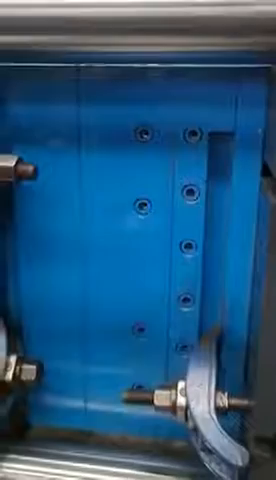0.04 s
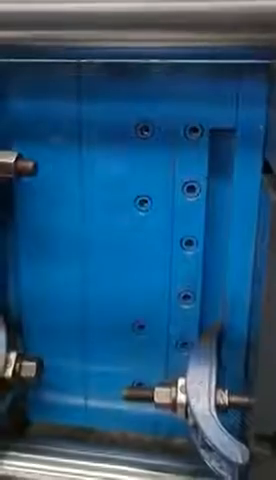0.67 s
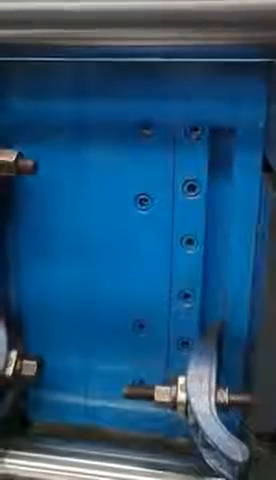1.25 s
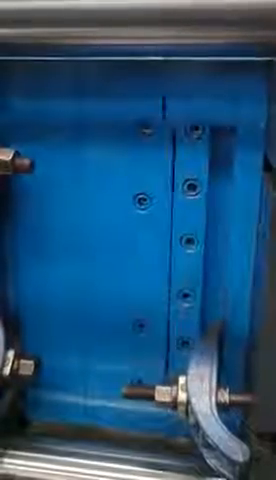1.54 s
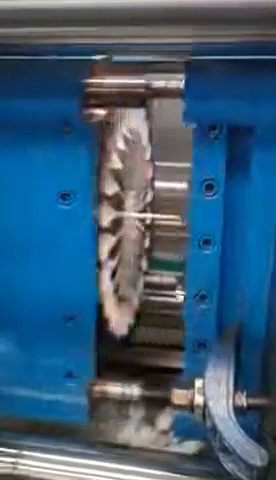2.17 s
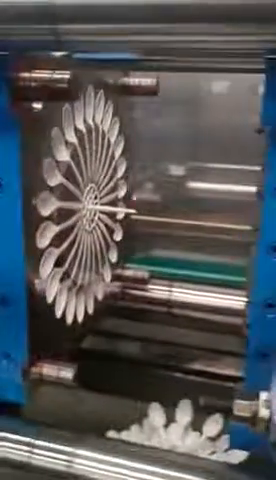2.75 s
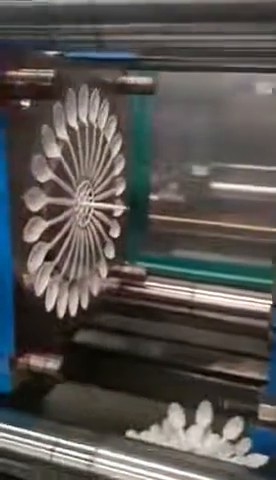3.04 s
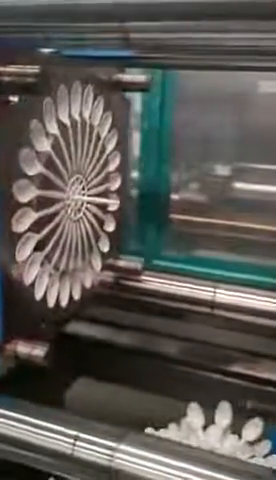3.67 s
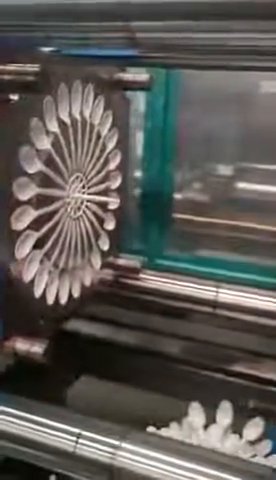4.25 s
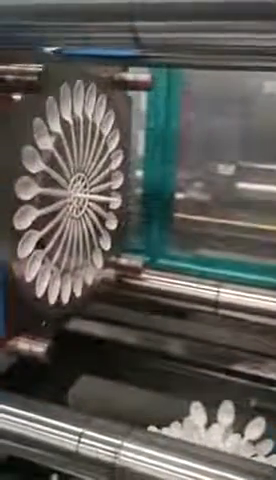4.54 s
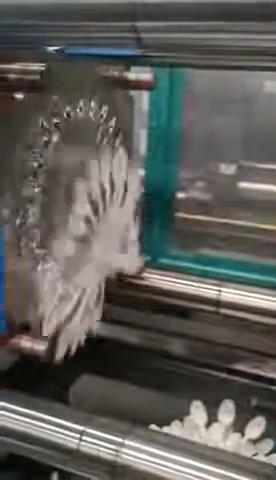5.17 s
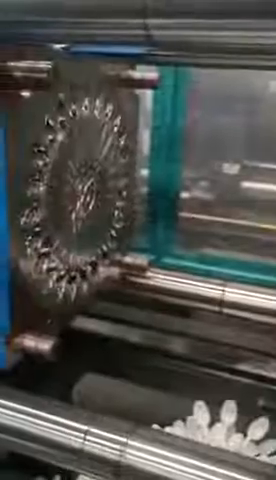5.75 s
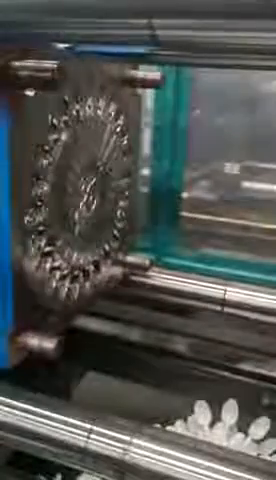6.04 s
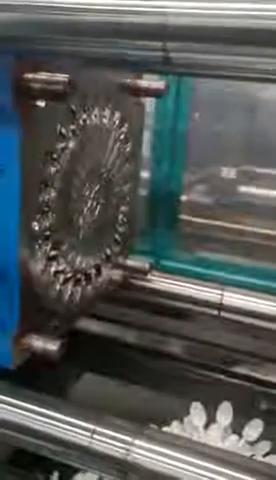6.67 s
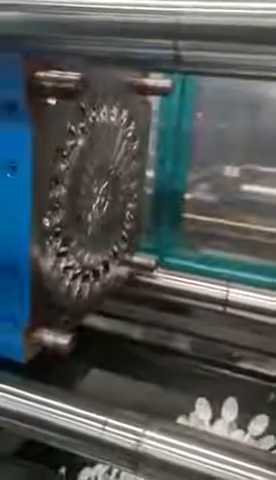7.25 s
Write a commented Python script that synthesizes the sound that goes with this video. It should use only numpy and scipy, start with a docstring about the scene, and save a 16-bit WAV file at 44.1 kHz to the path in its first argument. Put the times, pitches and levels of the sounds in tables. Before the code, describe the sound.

Over a hydraulic hum, a steel mould thumps open and squeaks, and two chattering ejector strokes follow, the first dropping plastic spoons.

```python
"""An injection moulding machine, close by in a factory hall, opens its mould and ejects plastic spoons.
Its ejector runs twice (out, bounce, back, chatter), leaving the steel ringing; on the first stroke the
spoons tear loose and rattle down. Before that the clamp lets go with thumps and a crunch, and the platen
slides off, groaning and squeaking. Underneath, the hydraulic pump hums and sags in pitch under load,
over the rumble and rush of oil."""
import sys
import numpy as np
from scipy import signal
from scipy.fft import rfft, irfft, next_fast_len
from scipy.io import wavfile
from scipy.ndimage import uniform_filter1d

SR = 44100
rng = np.random.default_rng(int(sys.argv[2]) if len(sys.argv) > 2 else 0)


def master(y):
    """Save y as 16-bit WAV."""
    cut = np.clip(np.atleast_2d(y).T, -1, 1)
    pcm = np.round(cut * 32767)  # scale
    wavfile.write(sys.argv[1], SR, pcm.astype(np.int16))


N = 322371
T = np.arange(N) / SR
FREQS = np.fft.rfftfreq(N, 1 / SR)
SIDES = np.array([[1], [-1]])  # left, right


def undb(db):
    """Decibels to gain."""
    return 10 ** (np.asarray(db) / 20)

def unit(x):
    """Scale to rms 1."""
    return x / np.sqrt(np.mean(x ** 2))

def over_time(points):
    """Automation curve through (t/s, value) points."""
    return np.interp(T, *np.transpose(points))

def over_hz(points):
    """Curve through (f/Hz, value) points on a log-frequency axis."""
    hz, value = np.transpose(points)
    return np.interp(np.log(FREQS + 1), np.log(hz), value)

def walk(rate):
    """Smooth random modulator of rms 1 that moves at up to about rate Hz."""
    steps = signal.resample_poly(rng.standard_normal(int(2 * rate * N / SR) + 2), 8, 1)
    return unit(np.interp(T, np.linspace(0, T[-1], len(steps)), steps))

def fade(t, t60):
    """Exponential decay, 60 dB down after t60."""
    return np.exp(-np.log(1000) * t / t60)

def add(out, s, x):
    """Mix x into out from time s."""
    start = int(s * SR)
    part = x[..., :N - start]
    out[..., start:start + part.shape[-1]] += part

def swells(table, steep=2.95):
    """Envelope of rounded bursts, each with its own rise and fall."""
    power = 0
    for s, db, rise, fall in table:
        from_peak = np.abs(T - s) / np.where(T < s, rise, fall)
        power += (undb(db) / (1 + from_peak ** steep)) ** 2
    return np.sqrt(power)

def ring(modes, t, push_s, detune, spot_db=0):
    """Modes rung by a push that builds over push_s, each as strongly as the struck spot allows."""
    out = 0
    for (hz, db, t60, lag), (off, spot) in zip(modes, rng.standard_normal((len(modes), 2))):
        phase = 2 * np.pi * hz * (1 + detune * off) * t + lag * SIDES
        out += undb(db + spot_db * spot) * fade(t, t60) * np.sin(phase)
    return out * (1 - np.exp(-(t / push_s) ** 2))

def stick_slip(table, rate, chatter_db, octave_db):
    """Bursts of rubbing: a tone and its octave stumble in pitch and strength."""
    drift = np.cumsum(walk(rate)) / SR
    grip = unit(undb(chatter_db * walk(rate / 2)))
    out = 0
    for *burst, hz, jitter in table:
        phase = 2 * np.pi * hz * (T + jitter * drift)
        out += swells([burst]) * (np.sin(phase) + undb(octave_db) * np.sin(2 * phase))
    return np.sqrt(2) * grip * out

# Stereo image of the noise: f/Hz, left-right correlation (clipped to +-0.99 in use)
LIKENESS = [(80, 5.5), (200, 1.05), (500, 0.62), (900, 0.13), (1500, -0.33), (2600, 0), (7000, 0)]
def colour(spectrum, x=None, hollow_db=3.5, hollow_width_hz=45):
    """Stereo noise (or x) shaped to a spectrum, at rms 1; long waves reach both sides alike."""
    mid, side = rfft(rng.standard_normal((2, N)) if x is None else x)
    alike = np.clip(over_hz(LIKENESS), -.99, .99)
    mid, side = mid * np.sqrt(1 + alike), side * np.sqrt(1 - alike)
    # reflections inside the guards raise narrow peaks among the short waves
    comb = uniform_filter1d(rng.standard_normal((2, len(FREQS))), int(hollow_width_hz * N / SR) + 1)
    db = over_hz(spectrum) + hollow_db * unit(comb) * np.minimum(FREQS / 1000, 1)
    return unit(irfft(np.array([mid + side, mid - side]) * undb(db), N))

def hall(x, wet_db=-13, t60=0.33, dull_hz=3500):
    """Add the diffuse echo of the factory hall, duller than the direct sound."""
    t = T[:SR]
    tail = rng.standard_normal((2, SR)) * fade(t, t60) * (1 - np.exp(-t / 0.0056))
    tail /= np.sqrt(np.sum(tail[0] ** 2))
    tail = signal.sosfilt(signal.butter(1, dull_hz, fs=SR, output="sos"), tail)
    return x + undb(wet_db) * signal.fftconvolve(x, tail, axes=1)[:, :N]

def flicker(x, depth_db=2.5, rate=20, count=16):
    """The hiss flickers: each frequency band wavers in level on its own."""
    size = next_fast_len(N)
    position = np.interp(np.log(np.fft.rfftfreq(size, 1 / SR) + 1), np.log([400, 7000]), [0, count - 1])
    spectrum = rfft(x, size)
    bands = (irfft(spectrum * np.maximum(1 - np.abs(position - k), 0), size) for k in range(count))
    return sum(band[:, :N] * undb(depth_db * walk(rate)) for band in bands)

def guard_reflections(x, depth_db=3.2, width_hz=100, hold_s=0.14, size=2048):
    """Narrow resonances come and go as the listener drifts among the reflections from the guards."""
    hz, s, bands = signal.stft(x, SR, nperseg=size)
    peaks = rng.standard_normal(bands.shape[1:])
    peaks = uniform_filter1d(peaks, int(width_hz / hz[1]) + 1, axis=0)
    peaks = uniform_filter1d(peaks, int(hold_s / s[1]) + 1, axis=1)
    return signal.istft(bands * undb(depth_db * unit(peaks)), SR, nperseg=size)[1][:, :N]

# Oil flow, the shared fader of rumble and rush: t/s, level/dB
OIL_FLOW = [(0.0, -46.5), (1.79, -46), (2.16, -43.5), (2.99, -44.5), (3.3, -42.5), (3.97, -43), (4.11, -44),
            (4.76, -44.5), (5.13, -44.5), (5.56, -51), (6.01, -49.5), (6.54, -43), (6.84, -47),
            (7.31, -51.5)]
# The frame shudders as clamp pressure drops and as the platen brakes: peak t/s, level/dB, rise/s, fall/s
SHUDDERS = [(1.2, -31.5, 0.23, 0.31), (3.2, -36, 0.22, .3)]
# Tone of the frame's rumble and of the oil's rush: f/Hz, relative level/dB
RUMBLE_EQ = [(25, -24.5), (50, -14.5), (90, -5), (170, 2), (260, 2), (400, -3), (560, -10.5), (800, -16.5),
             (1200, -26.5), (2500, -56.5)]
RUSH_EQ = [(300, -11.5), (700, 5.5), (1350, 4), (1900, -2), (2500, 0), (3100, 2.5), (3650, -5),
           (4400, -10.5), (5600, -11.5), (6700, -9), (7800, -26)]
def hydraulics(phase, rumble_db=8, rush_db=7, throb_db=1.87, ripple=0.09):
    """Oil rushes in the pipes, pulsing with the pump; the frame rumbles with the flow."""
    flow_db = over_time(OIL_FLOW)
    shaking = np.hypot(undb(flow_db + rumble_db), swells(SHUDDERS))
    rumble = colour(RUMBLE_EQ) * shaking * undb(throb_db * walk(12))
    rush = guard_reflections(flicker(colour(RUSH_EQ, hollow_db=1.5)))
    return rumble + rush * undb(flow_db + rush_db) * (1 + ripple * np.sin(phase))

# Pitch of the hum, sagging as the motor slows under load: t/s, f/Hz
HUM_PITCH = [(0, 223.5), (1.85, 222.9), (2.3, 219.8), (3.2, 221.9), (3.7, 221.7), (4.15, 220.4),
             (4.7, 222.5), (7.31, 222)]
def pump_phase(wander=0.0044):
    """Phase of the pump's pressure ripple, wavering a little."""
    return 2 * np.pi * np.cumsum(over_time(HUM_PITCH) * (1 + wander * walk(23))) / SR

# Faders of the hum's fundamental and of its octave: t/s, level/dB
HUM_LEVEL = [(0, -34), (.53, -30.5), (1.14, -41), (1.37, -29.5), (1.6, -49), (1.80, -57), (1.84, -31),
             (2.02, -32.5), (2.2, -26), (2.4, -23), (2.47, -29.5), (2.67, -24.5), (2.88, -46),
             (3.22, -40.5), (3.3, -31.5), (3.96, -23.5), (4.06, -30.5), (4.15, -24), (4.42, -32),
             (4.52, -27.5), (4.64, -43), (4.71, -23.5), (4.83, -46), (4.88, -26), (5.1, -37.5), (5.3, -64),
             (5.6, -49.5), (6.54, -43.5), (6.67, -50.5), (7.0, -39.5), (7.31, -39)]
OCTAVE_LEVEL = [(0, -45.5), (.6, -46.5), (1.6, -51), (2.45, -47.5), (2.82, -37), (3.2, -43.5), (3.6, -51.5),
                (4.2, -46), (4.8, -37), (5.2, -51), (7.31, -55.5)]
# Standing waves pan the fundamental: t/s, left minus right/dB
HUM_PAN = [(0.0, -4), (2.75, -4), (2.91, -24), (3.01, 19), (3.42, -4.5), (6.82, -0.5), (7.31, -4)]
# Upper overtones: multiple of the fundamental, level against the octave/dB
HUM_OVERTONES = [(3, -8), (6, -12)]
def pump(phase, flutter_db=1.7, lag_rad=0.23, waver_rad=0.63):
    """The pump's pressure ripple hums, with fluttering overtones."""
    stereo_phase = phase + lag_rad * SIDES
    hum_db = over_time(HUM_LEVEL) + SIDES * over_time(HUM_PAN) / 2
    hum = undb(hum_db + flutter_db * walk(24)) * np.sin(stereo_phase)
    octave_db = over_time(OCTAVE_LEVEL)
    for k, db in [(2, 0)] + HUM_OVERTONES:
        gain = undb(octave_db + db + 2 * walk(8))
        hum += gain * np.sin(k * stereo_phase + waver_rad * (k - 1) * walk(16))
    return np.sqrt(2) * hum

# Whine of the drive: f/Hz, level/dB
WHINES = [(3905, -74.5)]
def drive():
    """The drive holds a thin, faintly wavering whine."""
    whine = 0
    for hz, db in WHINES:
        whine += undb(db + 1.3 * walk(8.6)) * np.sin(2 * np.pi * hz * T + 0.8 * walk(7.6) + SIDES)
    return np.sqrt(2) * whine

# Partials of the groan: multiple of its pitch, relative level/dB
GROAN_PARTIALS = [(1, -1), (2.2, -12.5)]
# Rough spots on the slideways: peak t/s, level/dB, rise/s, fall/s, f/Hz, jitter/share of f
SCRAPES = [(2.38, -31, 0.033, .035, 275, .2), (2.73, -34.5, 0.029, .035, 322, .04),
           (3.09, -30, 0.046, 0.069, 314, .06), (3.30, -34.5, .03, 0.07, 358, .08),
           (3.93, -36.5, 0.04, 0.037, 440, .06)]
def platen(groan_hz=146, groan_db=-37, wander=0.0136, judder_db=3):
    """The heavy platen speeds up, slides and brakes, groaning unevenly and grinding here and there."""
    start_s, stop_s, speed_up_s, brake_s = 1.32, 3.46, 0.35, 0.24
    speed = np.clip(np.minimum((T - start_s) / speed_up_s, (stop_s - T) / brake_s), 0, 1)
    phase = 2 * np.pi * np.cumsum(groan_hz * (1 + wander * walk(12))) / SR
    groan = sum(undb(db + judder_db * walk(12)) * np.sin(k * phase) for k, db in GROAN_PARTIALS)
    grind = stick_slip(SCRAPES, rate=120, chatter_db=2.5, octave_db=-17.5)
    return np.sqrt(2) * undb(groan_db) * speed * groan + grind

# Squeaks of the sliding parts: peak t/s, level/dB, rise/s, fall/s, f/Hz, jitter/share of f
SQUEAKS = [(2.1, -41.5, .06, 0.07, 3400, .05), (2.06, -41.5, .08, .1, 2900, .012),
           (3.355, -32.5, .025, 0.03, 3410, .055), (3.452, -32, .028, 0.027, 3250, .05),
           (3.685, -30, .05, .11, 3390, 0.055), (3.4, -49, .25, 0.28, 4020, 0.006),
           (4.65, -41.5, .069, 0.09, 3570, .012), (4.925, -35, 0.013, .019, 3650, 0.051),
           (7.25, -44, 0.18, 0.14, 2813, 0.059)]
def tie_bars():
    """Metal rubs and sings on the tie bars; each side hears its own reflection of it."""
    return np.array([stick_slip(SQUEAKS, rate=600, chatter_db=3, octave_db=-18.5) for _ in range(2)])

# Cue of each ejector cycle, where the plate hits the front stop: t/s
EJECTIONS = [4.770, 6.133]
def each_cycle(table):
    """Repeat a table's rows at every ejection, timed from its cue."""
    return [(cue + s, *rest) for cue in EJECTIONS for s, *rest in table]

# Spurts as the clamp releases: peak t/s, level/dB, rise/s, fall/s
CLAMP_SPURTS = [(1.01, -39, 0.035, 0.042), (1.18, -40, 0.058, 0.087), (1.34, -32.5, 0.037, 0.024)]
# Spurts of the ejector's valve: peak t/s from the cue, level/dB, rise/s, fall/s
VALVE_SPURTS = [(.01, -29, 0.016, 0.029), (.228, -37.5, 0.022, 0.033), (.305, -34.5, 0.015, 0.015),
                (.386, -26.5, .014, .026), (.638, -32.5, .016, 0.018)]
# Bright hiss of a spurt: f/Hz, relative level/dB
SPURT_EQ = [(1000, -29), (2200, -0.5), (3200, 1.5), (4200, -2), (5500, -0.5), (6500, 1), (7800, -13.5)]
def valves():
    """Oil spurts through the valves in short hisses."""
    return swells(CLAMP_SPURTS + each_cycle(VALVE_SPURTS)) * colour(SPURT_EQ)

# One-off thumps, knocks and pings in the frame: t/s, level/dB, f/Hz, t60/s
FRAME_KNOCKS = [(.980, -19, 185, 0.21), (0.998, -18, 338, 0.1), (1.052, -22.5, 104.5, 0.22),
                (1.152, -11.5, 179, 0.33), (1.168, -24, 840, 0.11), (1.322, -18.5, 450, 0.11),
                (1.845, -31.5, 5210, 0.074), (2.289, -17.5, 335, 0.091), (3.332, -4, 3140, 0.019),
                (4.384, -14.5, 224, 0.088), (4.386, -24.5, 405.2, .2), (5.745, -19, 799, 0.15),
                (5.775, -24, 763, 0.14), (5.790, -23.5, 218.5, 0.21), (5.948, -25, 227.4, 0.071)]
# The valve knocks shut after either stroke: t/s from the cue, level/dB, f/Hz, t60/s
VALVE_KNOCKS = [(.219, -21, 432, 0.23), (.225, -25, 840, 0.13), (.285, -24, 861, .25),
                (.740, -24, 349, 0.1), (.75, -23.5, 272.2, 0.16)]
def knocks(push_s=0.0044, partner_ratio=1.13, partner_db=-9, max_lag_rad=0.22):
    """A soft push rings a close pair of damped modes in the frame or the pipes."""
    out, t = np.zeros((2, N)), T[:SR // 2]
    for s, db, hz, t60 in FRAME_KNOCKS + each_cycle(VALVE_KNOCKS):
        lag = max_lag_rad * min(hz / 1000, 1)
        pair = [(hz, 0, t60, lag), (hz * partner_ratio, partner_db, t60, lag)]
        add(out, s, undb(db) * ring(pair, t, push_s, detune=0.0022))
    return out

# The clamp lets go, the mould cracks apart and the ejector strains: t/s, level/dB, t60/s
CRUNCHES = [(0.984, -28, 0.49), (1.15, -30, 0.54), (1.316, -17, 0.19), (1.345, -23.5, 0.42),
            (4.386, -33, 0.56), (4.988, -27.5, 0.36), (5.742, -31, 0.28)]
# Tone of the crunch: f/Hz, relative level/dB
CRUNCH_EQ = [(80, -16), (200, 5.5), (500, 9), (850, 12), (1300, -2.5), (2000, -6.5), (3000, -6.5),
             (4200, -12), (7500, -17.5)]
# Clink of the mould halves: f/Hz, relative level/dB, t60/s, stereo phase/+-rad
MOULD_MODES = [(1475, -3, .2, .9), (2740, -6, .2, .59), (2880, -4, .3, .5), (2985, -3, .22, .5),
               (3080, 0, .17, .6), (3270, 3, .13, .6), (3880, -8, .12, .47), (4040, -1, .12, .3),
               (5130, -9, .17, .9), (6395, -12, .25, 1.2)]
def clamp(grit_db=3, rise_s=0.008, clink_db=-7.5):
    """Strained steel and plastic let go in a dense run of tiny slips, and the mould halves clink."""
    envelope, clinks, t = np.zeros(N), np.zeros((2, N)), T[:SR // 2]
    for s, db, t60 in CRUNCHES:
        add(envelope, s, undb(db) * (1 - np.exp(-t / rise_s)) * fade(t, t60))
        add(clinks, s, undb(db + clink_db) * ring(MOULD_MODES, t, rise_s, detune=0.0037))
    slips = rng.standard_normal((2, N)) * undb(grit_db * walk(300))
    return clinks + envelope * colour(CRUNCH_EQ, slips, hollow_db=4)

# Plastic crackles loose and tumbles: peak t/s, level/dB, rise/s, fall/s
RATTLES = [(1.85, -38, 0.013, 0.013), (4.805, -25.5, 0.024, 0.033), (5.0, -32, 0.019, 0.013),
           (5.07, -33.5, 0.032, 0.11), (5.42, -36, 0.057, 0.077), (7.03, -42, 0.038, 0.053)]
# Brittle tone of the plastic: f/Hz, relative level/dB
RATTLE_EQ = [(800, -9.5), (2000, -8.5), (3000, 8.5), (4200, 5), (5500, 3), (6500, 1), (7800, -12)]
def spoons(ticks_per_s=5000):
    """Light plastic parts tick against each other and the chute."""
    ticks = (rng.random((2, N)) < ticks_per_s / SR) * rng.standard_normal((2, N))
    return swells(RATTLES) * colour(RATTLE_EQ, ticks)

# Body of the plate on its front and back stops: f/Hz, relative level/dB, t60/s, stereo phase/+-rad
FRONT_MODES = [(270, -14, .12, .05), (419.5, -14.5, 0.16, .25), (658, -8, 0.14, 0.34), (838, -3, .1, .65),
               (886, 0, .09, .6), (950, 8, .038, .65), (1025, 0, .05, 1.05), (1224, -16, 0.086, 0.95),
               (1790, -18, 0.091, 1.2), (2484, -18.5, 0.11, 0.48), (2855, -13, 0.084, 0.56),
               (3050, -18.5, .08, .5), (3770, -17.5, .11, .7)]
BACK_MODES = [(268.3, -10, 0.11, 0.06), (433, -12.5, 0.16, .25), (521, -7, 0.11, 0.47),
              (650, -6.5, 0.11, 0.3), (806, -3, 0.099, 0.36), (864, -7, .11, .6), (881, 3.5, .115, .62),
              (1030, -4, .08, 1.15), (1248, -9, 0.091, 0.94), (1590, -13, .06, 1.1),
              (1880, -19, 0.08, 0.63), (2260, -22, .08, 0.68), (2890, -15.5, 0.085, 0.46),
              (3080, -19.5, .12, 0.4)]
# The pins touch, the plate hits the front stop and bounces: t/s, blow level/dB, crack level/dB
FRONT_BLOWS = [(4.753, -25, -29), (4.7703, -7, -22), (4.7897, -11, -24), (4.8068, -19, -24),
               (4.8283, -23, -26), (6.119, -28, -28), (6.132, -10, -19.5), (6.1512, -8, -21),
               (6.1727, -16, -26), (6.1930, -18, -29)]
# The plate slams into the back stop and chatters: t/s, blow level/dB, crack level/dB
BACK_BLOWS = [(5.161, -10, -17.5), (5.1758, -9.5, -23), (5.1871, -12.5, -28), (5.2178, -15.5, -27),
              (6.521, -9, -17), (6.5426, -9, -22), (6.5676, -16.5, -29), (6.5869, -16, -31)]
# Attack (contact noise) and tail (crowded modes of the steel frame): f/Hz, relative level/dB
CRACK_EQ = [(50, -23), (130, -4), (250, 4.5), (600, 6.5), (1000, 3), (1500, 0), (2100, -2), (2900, -1.5),
            (4000, -7.5), (5000, -19.5), (7500, -37.5)]
STEEL_EQ = [(150, -39), (280, -10), (370, -11), (420, -4.5), (470, -17.5), (740, -5), (830, -1), (875, 8.5),
            (930, -5), (1060, -6.5), (1300, -47), (2400, -41), (2900, -15.5), (4000, -58.5)]
def ejector(steel_db=-20.5, steel_t60=1.77, crack_t60=0.19, push_s=0.0026):
    """Each contact cracks and rings the plate; the heavy frame behind it rings on."""
    plate, t = np.zeros((2, N)), T[:SR]
    crack_power, steel_power = np.zeros(N), np.zeros(N)
    attack = 1 - np.exp(-t / push_s)
    for modes, blows in (FRONT_MODES, FRONT_BLOWS), (BACK_MODES, BACK_BLOWS):
        for s, blow_db, crack_db in blows:
            add(plate, s, undb(blow_db) * ring(modes, t[:SR // 4], push_s, detune=0.0025, spot_db=2.5))
            add(steel_power, s, (undb(blow_db + steel_db) * attack * fade(t, steel_t60)) ** 2)
            add(crack_power, s, (undb(crack_db) * attack * fade(t, crack_t60)) ** 2)
    crack = np.sqrt(crack_power) * colour(CRACK_EQ, hollow_db=5, hollow_width_hz=70)
    steel = np.sqrt(steel_power) * colour(STEEL_EQ)
    return plate + crack + steel

# Balance of the bed, its treble leaning left: f/Hz, left minus right/dB
BED_PAN = [(80, 0), (180, 1), (600, -0.5), (2500, 4.5), (7000, 5.5)]
def scene():
    """A dry bed of running machinery under the events of one opening stroke, which echo in the hall."""
    phase = pump_phase()
    bed = pump(phase) + drive() + platen() + hydraulics(phase)
    bed = irfft(rfft(bed) * undb(SIDES * over_hz(BED_PAN) / 2), N)
    return bed + hall(valves() + ejector() + knocks() + clamp() + spoons() + tie_bars())

def record(dry, ceiling=0.9, low_cut_hz=35, high_cut_hz=7550):
    """Round the highest peaks, then cut the deep bass and the top."""
    rounded = ceiling * np.tanh(dry / ceiling)
    trimmed = signal.sosfilt(signal.butter(2, low_cut_hz, "highpass", fs=SR, output="sos"), rounded)
    return signal.sosfilt(signal.ellip(10, .2, 80, high_cut_hz, fs=SR, output="sos"), trimmed)


dry = scene()
out = record(dry)
master(out)
```